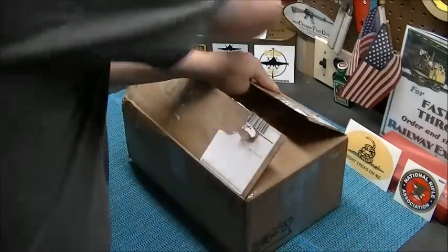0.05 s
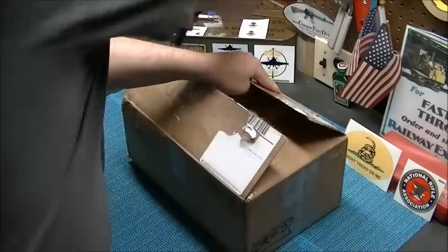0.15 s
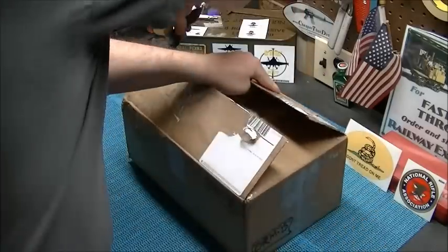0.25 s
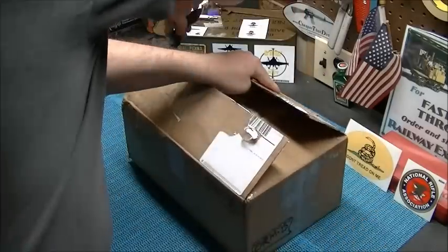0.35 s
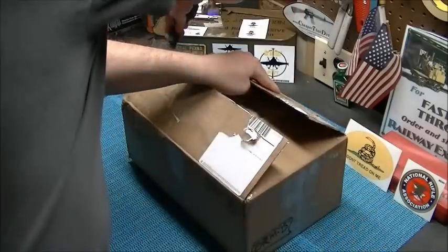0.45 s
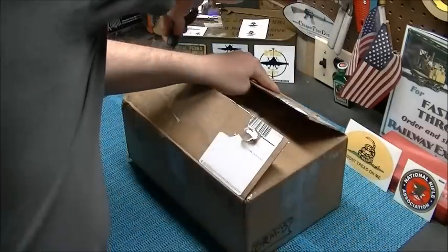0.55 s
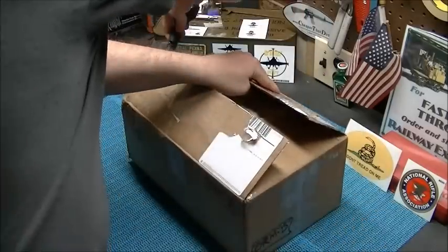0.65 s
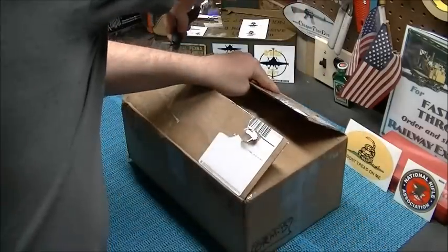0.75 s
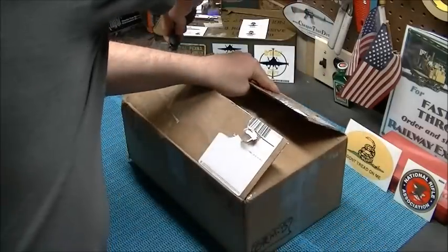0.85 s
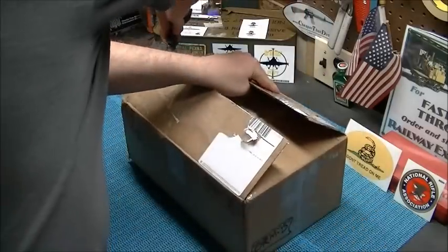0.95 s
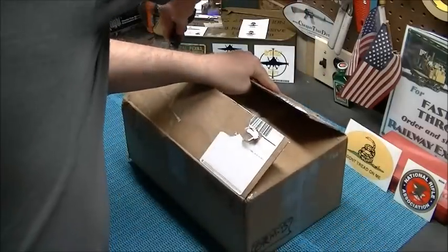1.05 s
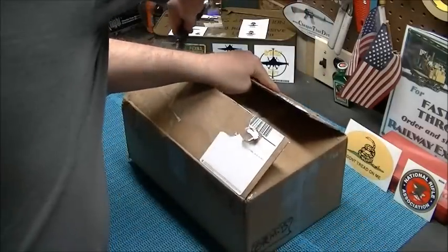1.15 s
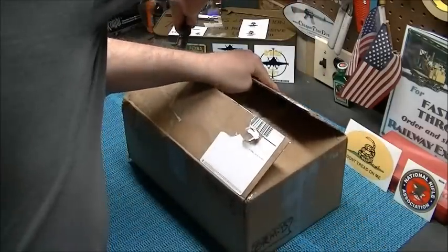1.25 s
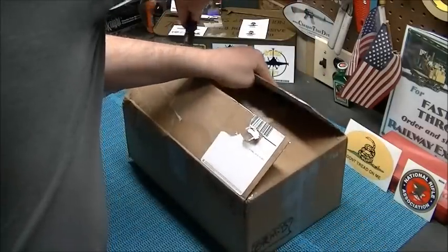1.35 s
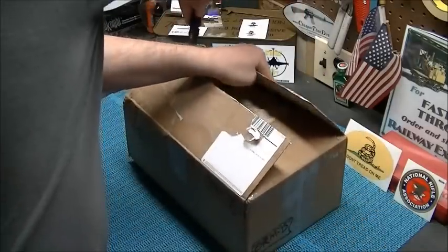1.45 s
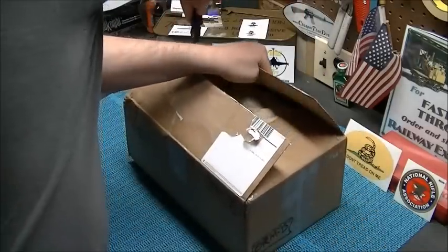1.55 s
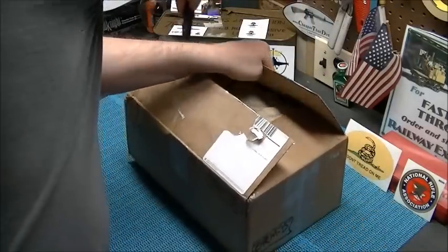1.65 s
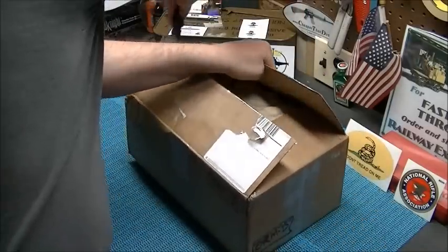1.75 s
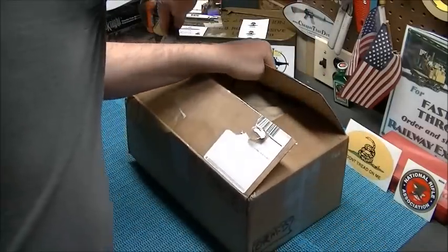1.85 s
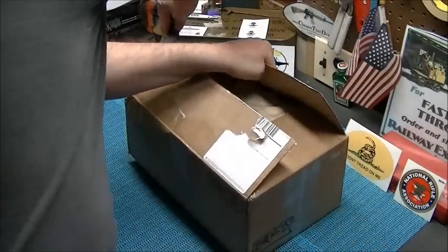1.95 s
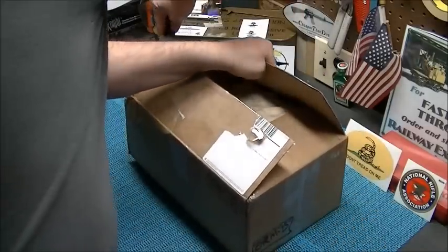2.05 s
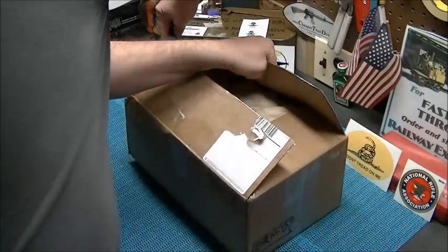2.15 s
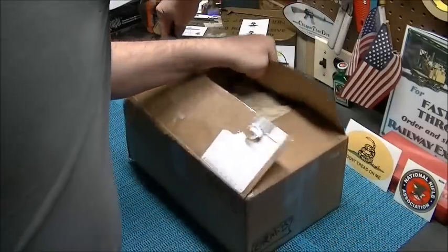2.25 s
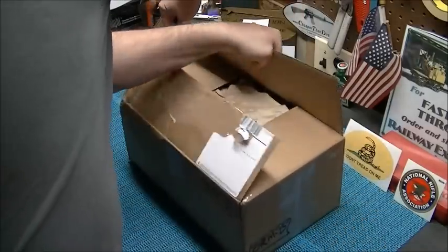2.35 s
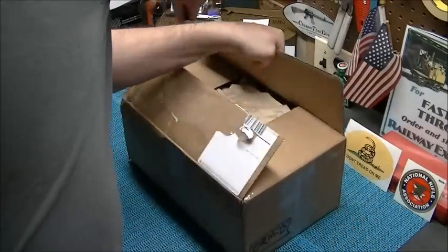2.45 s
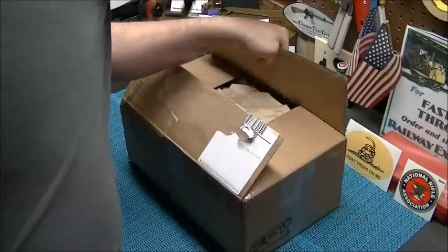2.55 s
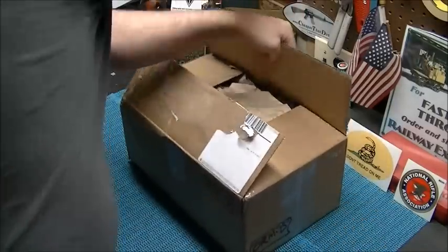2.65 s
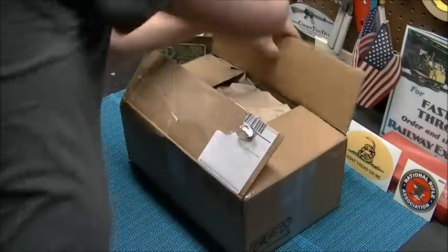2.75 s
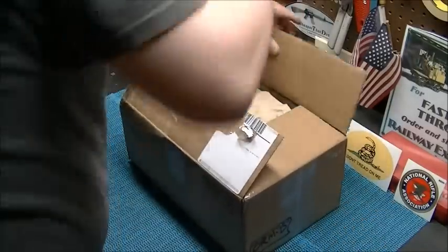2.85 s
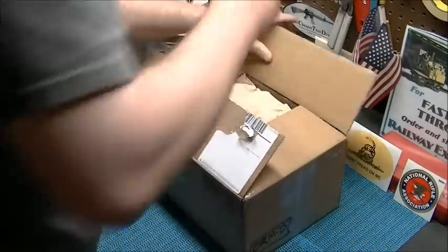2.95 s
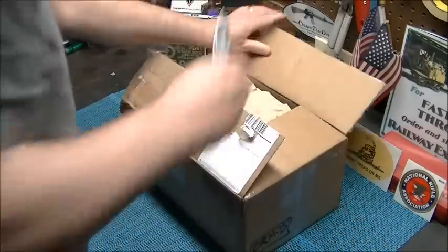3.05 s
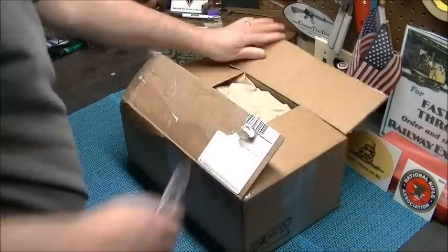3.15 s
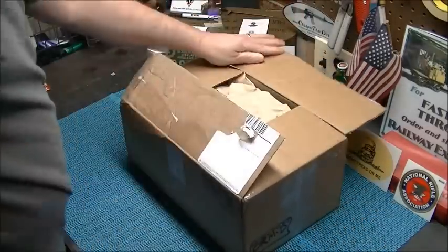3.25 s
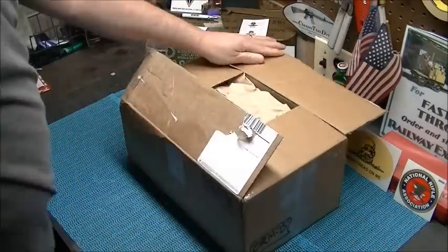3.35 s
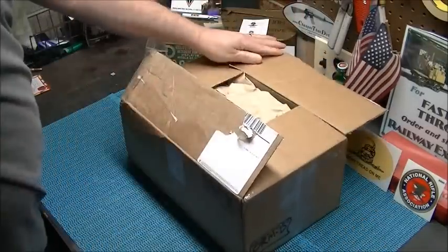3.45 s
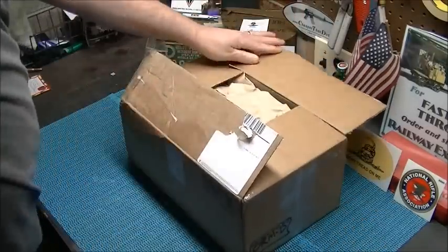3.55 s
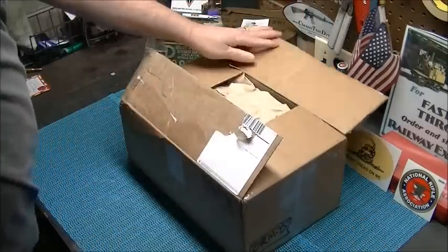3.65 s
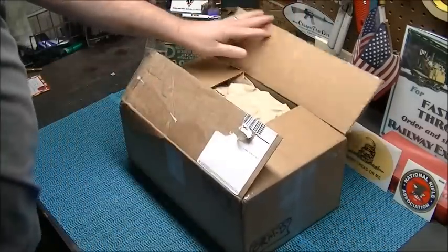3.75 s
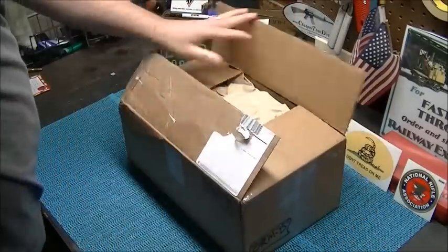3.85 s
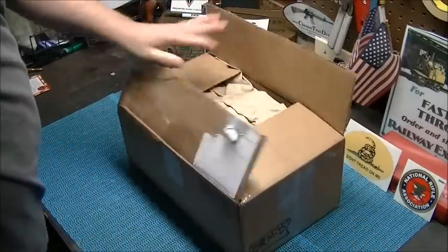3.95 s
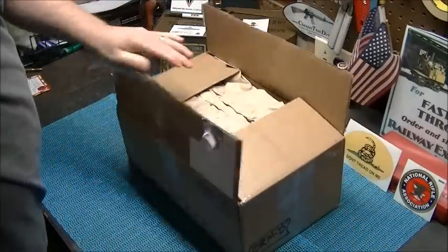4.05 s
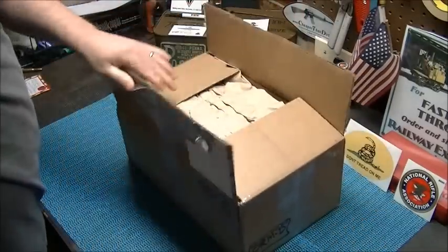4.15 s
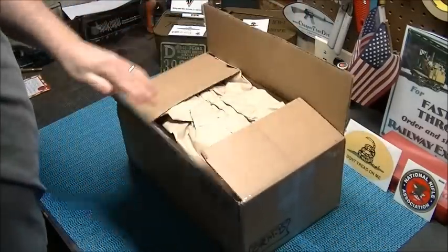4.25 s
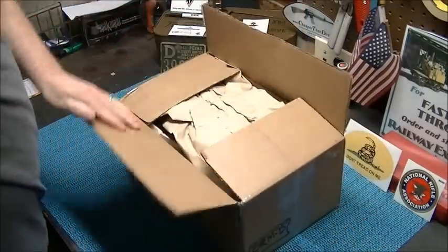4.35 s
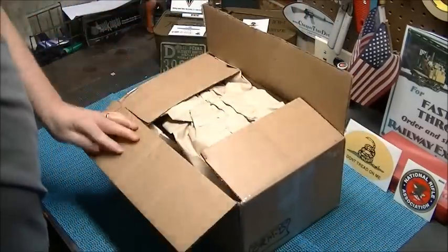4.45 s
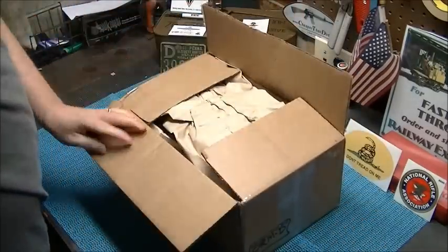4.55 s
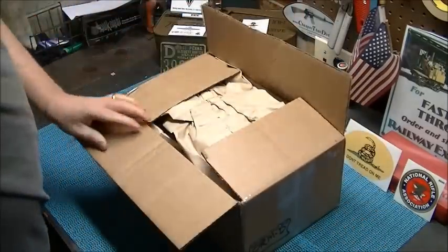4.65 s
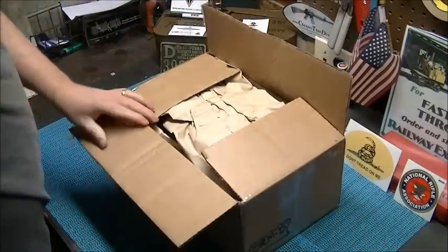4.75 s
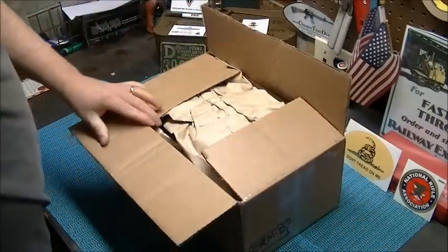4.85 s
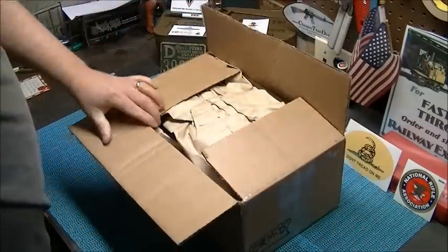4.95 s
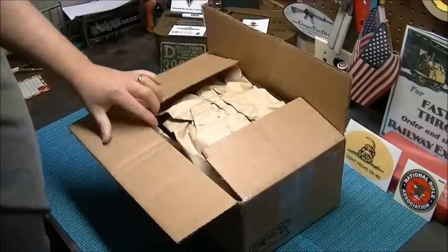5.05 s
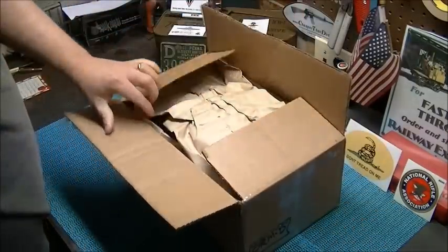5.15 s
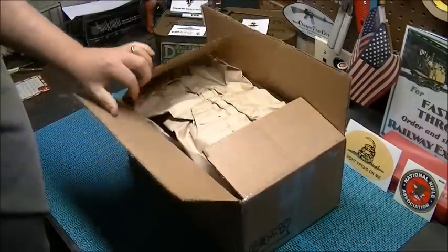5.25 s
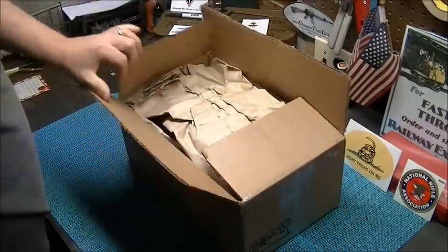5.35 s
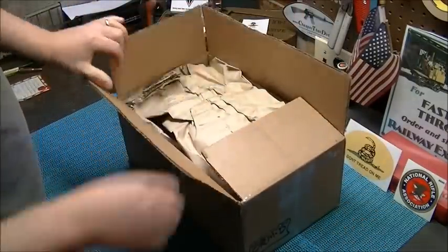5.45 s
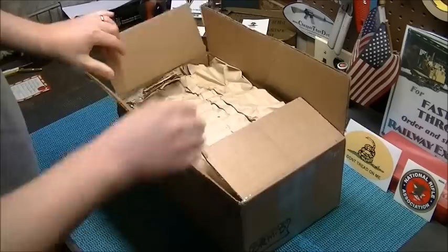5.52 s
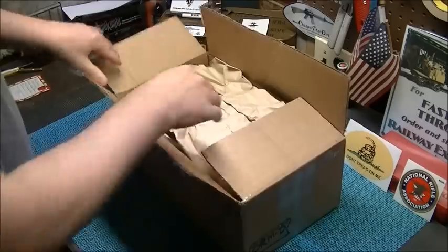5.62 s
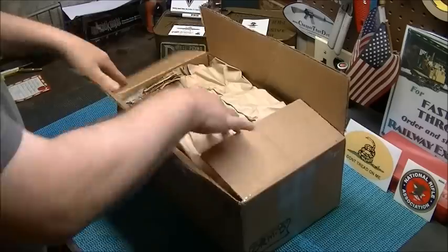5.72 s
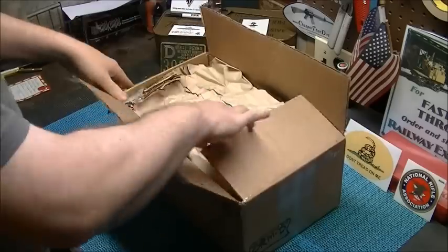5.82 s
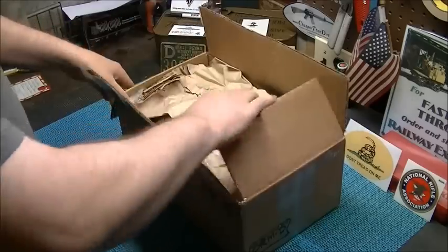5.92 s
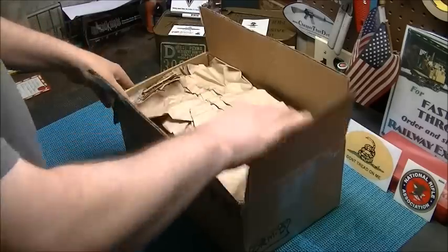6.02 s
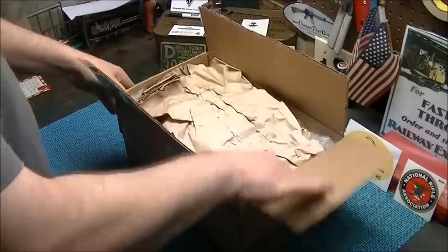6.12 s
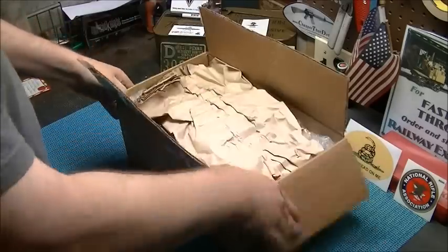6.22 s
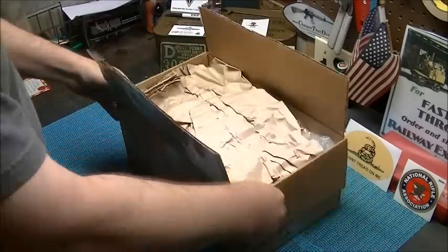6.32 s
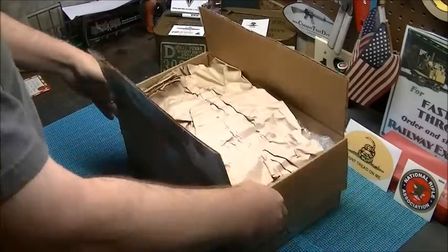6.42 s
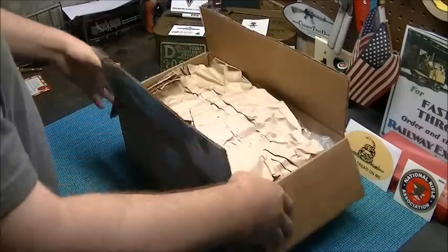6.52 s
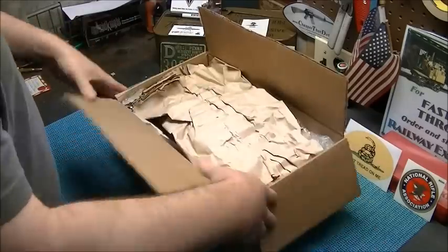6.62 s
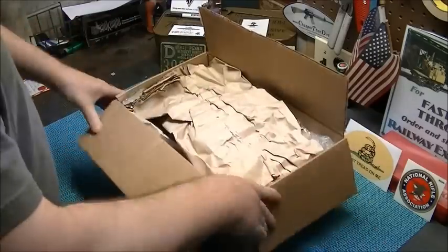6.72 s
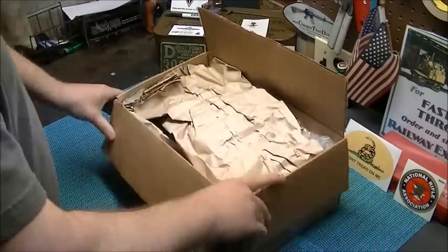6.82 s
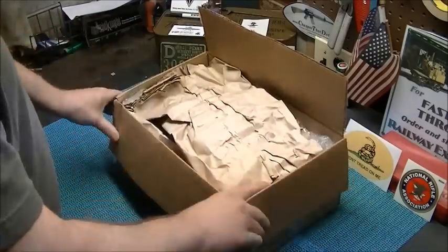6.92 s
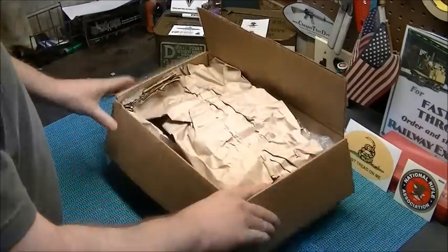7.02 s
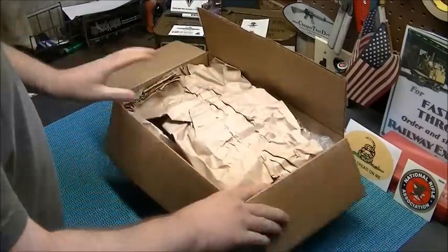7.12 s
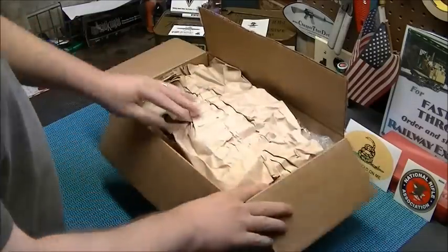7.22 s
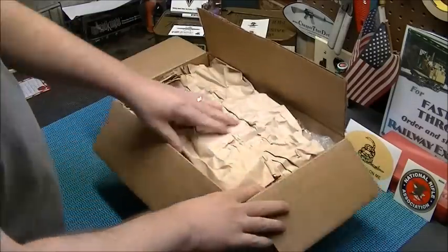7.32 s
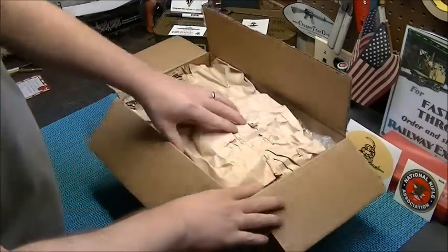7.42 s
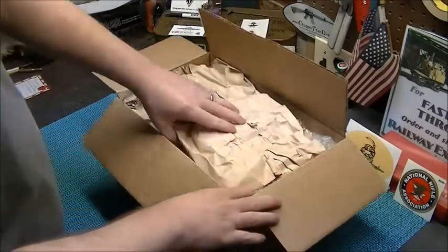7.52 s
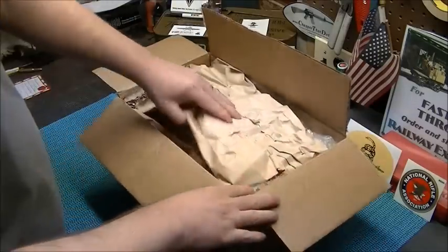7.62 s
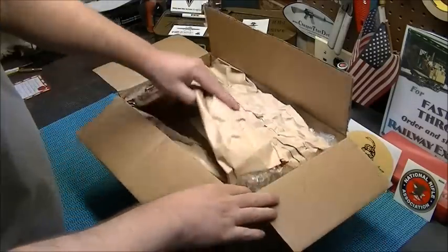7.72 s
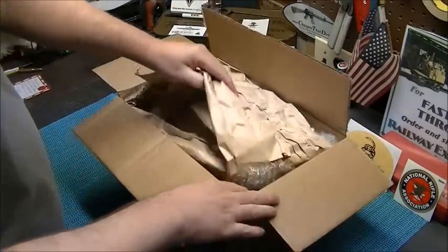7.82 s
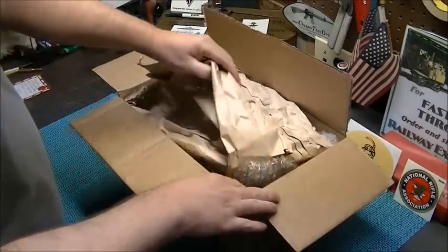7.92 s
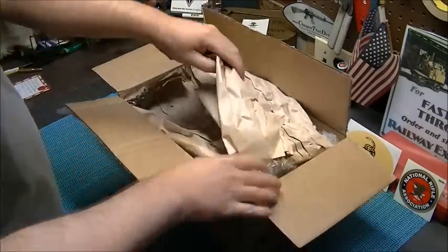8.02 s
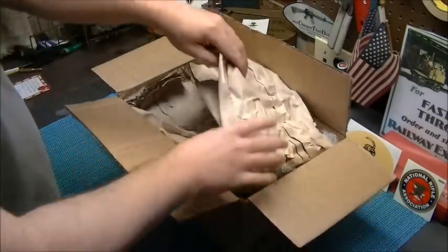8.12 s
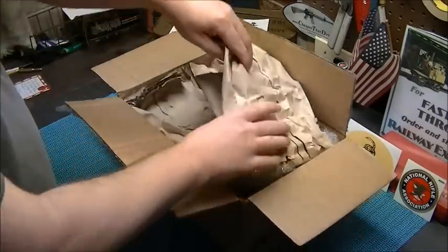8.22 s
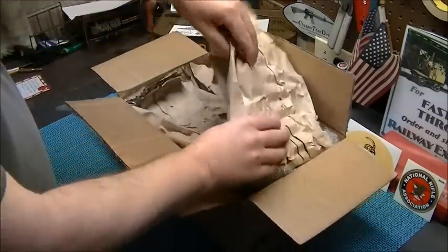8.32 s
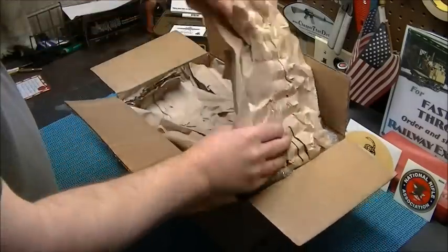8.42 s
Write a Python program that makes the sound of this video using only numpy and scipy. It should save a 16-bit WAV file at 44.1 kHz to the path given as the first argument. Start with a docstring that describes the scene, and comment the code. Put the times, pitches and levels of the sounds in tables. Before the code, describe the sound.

Close, nearly mono, in a small room with short echoes and a faint steady hush. At 0.2 s a soft hollow knock, then near quiet with faint handling rustle and small taps. From 1.0 to 1.6 s dry cardboard creaks, rubs and small cracks. At 2.3 s a hard snap and dull bump start a fluttering tape rip, its hollow tone mostly rising until about 2.7 s. Flap thuds come at 2.8 and 3.1 s, with light rubbing. Around 3.9-4.4 s a flap folds back with a brushing stroke and crisp cracks. At 5.05 s a brief harsh edge scrape; creases pop near 5.5 s. From 6 to 7.2 s palms slide over flaps, with a sharp crack at 6.1 s. From 7.3 s packing paper crinkles; a dull bump lands at 7.6 s, then louder crunching pulls, with short rough squeaks at 8.15-8.4 s.

```python
"""Cardboard box opened

A cardboard box is opened close by on a work table in a small room. The flaps creak, rip free of
their tape and scrape past each other; a hand then lifts crumpled, crinkling, squeaking packing paper.
Strokes are grains of breaking fibre, snaps and knocks are noise bursts with resonances, squeaks are
gliding tones. The box panels and the room ring along over a quiet hush."""
import sys
import numpy as np
from scipy import signal
from scipy.fft import rfft, irfft
from scipy.io import wavfile

SR = 44100
rng = np.random.default_rng(int(sys.argv[2]) if len(sys.argv) > 2 else 0)


def bounce(signal):
    """Save signal as a 16-bit WAV file at the path given by the first command-line argument."""
    frames = np.transpose(np.atleast_2d(signal))
    limited = np.clip(frames, -1, 1)
    pcm = np.round(limited * 32767).astype(np.int16)
    wavfile.write(sys.argv[1], SR, pcm)


N = 373968


def amp(db):
    """Decibels to gain."""
    return 10 ** (np.asarray(db) / 20)


def unit(x):
    """Scales to rms 1."""
    return x / np.sqrt(np.mean(x ** 2) + 1e-20)


def read(points, hz):
    """Interpolates a table on a log-frequency axis."""
    table_hz, value = np.transpose(points)
    return np.interp(np.log(hz + 1), np.log(table_hz + 1), value)


def add(mix, start_s, sound):
    """Mixes a sound in at start_s."""
    part = mix[max(round(start_s * SR), 0):][:len(sound)]
    part += sound[:len(part)]


def colour(x, spectrum, size=2048):
    """Causal minimum-phase filter with the given spectrum."""
    log_gain = np.log(amp(read(spectrum, abs(np.fft.fftfreq(size, 1 / SR)))))
    taps = np.fft.ifft(np.exp(np.conj(signal.hilbert(log_gain)))).real
    return signal.fftconvolve(x, taps[:size // 2])[:len(x)]


def highpass(x, order, cutoff_hz):
    """Butterworth high-pass."""
    return signal.sosfilt(signal.butter(order, cutoff_hz, "high", fs=SR, output="sos"), x)


BODY_TOP_HZ, RASP_TOP_HZ = 1000, 3500


def registers(x, order=3):
    """Splits a sound into body, rasp and fizz."""
    bands = [(BODY_TOP_HZ, "low"), ([BODY_TOP_HZ, RASP_TOP_HZ], "band"), (RASP_TOP_HZ, "high")]
    return [signal.sosfilt(signal.butter(order, hz, kind, fs=SR, output="sos"), x) for hz, kind in bands]


def ring(x, hz, width_hz):
    """One resonance of peak gain 1."""
    return signal.lfilter(*signal.iirpeak(hz, hz / width_hz, fs=SR), x)


def wander(count, top_hz):
    """Slow random signal of rms 1, with changes up to about top_hz."""
    hz = np.fft.rfftfreq(count, 1 / SR)
    spectrum = rfft(rng.standard_normal(count))
    return unit(irfft(spectrum / (1 + (hz / top_hz) ** 4), count))


def fibres(count, per_s, spread_db, smooth):
    """Fibres letting go: clicks of uneven size over a smooth sliding hiss."""
    size = amp(spread_db * np.minimum(rng.exponential(1, count), 4.5))
    polarity = rng.choice([-1, 1], count)
    clicks = size * polarity * (rng.random(count) < per_s / SR)
    return unit(unit(clicks) + smooth * rng.standard_normal(count))


# colour of the room's hush: hz, gain_db
HUSH_COLOUR = [(18, -52), (30, -37), (141, -12), (426, 5.5), (760, 7.5), (937, 1), (1390, 3.5), (2540, -3),
               (6380, -6), (11700, -26), (16000, -16)]


def hush(level_db=-59.5):
    """Steady coloured noise of the room."""
    return amp(level_db) * unit(colour(rng.standard_normal(N), HUSH_COLOUR))


# room decay: hz, t60_s
ROOM_DECAY = [(150, 0.54), (500, 0.28), (2000, 0.35), (6000, 0.23), (15000, 0.18)]


def reflections(early_db=-9, early_s=0.0061, tail_db=-10):
    """Quick returns from flaps and table, then the short tail of a cluttered room."""
    t = np.arange(SR // 2) / SR
    taps = rng.standard_normal(len(t)) * (rng.random(len(t)) < 4000 / SR) * (t > .005)
    hz, when_s, z = signal.stft(taps, SR, nperseg=256)
    decay = amp(-60 * when_s / read(ROOM_DECAY, hz)[:, None])
    tail = signal.istft(z * decay, SR, nperseg=256)[1][:len(t)]
    early = rng.standard_normal(len(t)) * (rng.random(len(t)) < 2500 / SR) * (t > .0015)
    early = early * np.exp(-t / early_s)
    return amp(early_db) * early / np.linalg.norm(early) + amp(tail_db) * tail / np.linalg.norm(tail)


def room(x, count=3, turn_hz=0.7943):
    """The pattern of echoes keeps changing as flaps and arms move."""
    angle = 2 * np.pi * turn_hz * np.arange(N) / SR
    shares = [np.cos(angle + np.pi * k / count) * np.sqrt(2 / count) for k in range(count)]
    return sum(signal.fftconvolve(x * share, reflections())[:N] for share in shares)


# panels and cavity of the box: hz, gain_db, t60_s
BOX_MODES = [(265, -3.5, 0.42), (373, -2, 0.15), (446.5, -3.5, 0.13), (581, -5, 0.16), (638.3, -2, 0.12),
             (824, -14, 0.069), (1240, -11, 0.29), (1440, -31, 0.19), (1810, -14, 0.055)]


def box(x):
    """Everything that touches the box also rings its panels and cavity."""
    return x + sum(amp(db) * ring(x, hz, np.log(1000) / np.pi / t60_s) for hz, db, t60_s in BOX_MODES)


# colour of rubbed cardboard: hz, gain_db
CARDBOARD_COLOUR = [(35, -59), (60, -42), (176, -22.5), (427, -3.5), (698, -1.5), (1090, -3), (1550, 1.5),
                    (1860, 4.5), (2300, -2.5), (5210, 1.5), (7400, 1), (12700, -5.5), (16000, -18)]


def handling(level_db=-65, swell_db=1.5, swell_hz=7):
    """Fingers never rest on the cardboard: a faint rustle under the strokes."""
    rustle = unit(colour(fibres(N, 300, 3.2, 1.0), CARDBOARD_COLOUR))
    return rustle * amp(level_db + swell_db * wander(N, swell_hz))


# whole box on the table: start_s, pitch_hz, level_db
BUMPS = [(2.319, 264, -29.5), (7.607, 395.4, -24.5)]


def bump(row, t60_s=0.11, rise_s=0.0044):
    """The loaded box rocks on the mat: a short, dull, decaying low tone."""
    start_s, hz, db = row
    t = np.arange(SR // 5) / SR
    decay = np.exp(-np.log(1000) * t / t60_s)
    return start_s, np.sin(2 * np.pi * hz * t) * amp(db) * decay * (1 - np.exp(-t / rise_s))


# colour of a knock's dry thud: hz, gain_db
THUD_COLOUR = [(40, -19), (150, -7.5), (400, -4), (700, 2.5), (1300, -1), (1900, -9.5), (3000, -14),
               (7000, -29), (16000, -48)]
# flaps and walls: start_s, level_db (energy per 10 ms), contact_ms,
# lowest_hz (that the panel carries), panel_1_hz, panel_2_hz, panel_3_hz
KNOCKS = [(0.2258, -33.5, 2.4, 173, 261, 616, 995), (0.23, -38, 4.9, 198, 370, 523, 1090),
          (0.515, -44, 2.4, 169, 476, 650, 1390), (0.663, -53, 3.3, 170, 238, 588, 814),
          (0.805, -44.5, 4, 300, 636, 827, 1323), (1.852, -39, 4.9, 200, 314, 510, 790),
          (2.773, -26.5, 3.5, 398, 473, 1442, 1567), (3.127, -28.5, 6.7, 390, 641, 1230, 1987),
          (3.712, -45, 5.4, 255, 452, 695, 1000), (4.104, -36, 8.5, 600, 752, 940, 1106)]


def knock(row, thud_gain=1.7, ring_ms=6.7, rise_ms=3.4):
    """A soft blow on a broad panel: a dry thud and a few short hollow resonances."""
    start_s, db, contact_ms, lowest_hz, *panel_hz = row
    t = np.arange(SR // 8) / SR
    ms = t * 1000
    rise = 1 - np.exp(-ms / rise_ms)
    thud = colour(rng.standard_normal(len(t)) * np.exp(-ms / contact_ms) * rise, THUD_COLOUR)
    envelope = rise * np.exp(-ms / ring_ms)
    hollow = sum(unit(np.sin(2 * np.pi * (hz * t + rng.random())) * envelope) for hz in panel_hz)
    sound = highpass(thud_gain * unit(thud) + hollow, 3, lowest_hz)
    return start_s, unit(sound) * amp(db) * np.sqrt(10 / ms[-1])  # rms to energy per 10 ms


def flex(x, depth_db, frames=14, bins=7):
    """The sheet bends as it is handled, so its resonances come and go."""
    z = signal.stft(x, nperseg=256)[2]
    patch = np.outer(np.hanning(bins), np.hanning(frames))
    patches = signal.convolve2d(rng.standard_normal(z.shape), patch, "same")
    return signal.istft(z * amp(depth_db * unit(patches)), nperseg=256)[1][:len(x)]


def stroke(rows, spectrum, per_s, spread_db, smooth, catch_db, catch_hz, trim_db,
           drift_db=1.0, drift_hz=14.0, flex_db=2.0, crumble_s=0.00069):
    """A surface slides, catching and slipping; each grain crumbles for a moment."""
    start_s, *levels_db = np.transpose(rows)
    t = start_s[0] + np.arange(SR // 2) / SR
    grains = fibres(len(t), per_s, spread_db, smooth) * amp(catch_db * wander(len(t), catch_hz))
    energy = signal.lfilter([1], [1, -np.exp(-1 / (crumble_s * SR))], grains ** 2)
    crumble = np.sqrt(np.maximum(energy, 0))
    sound = colour(flex(crumble * rng.standard_normal(len(t)), flex_db), spectrum)
    mix = np.zeros(len(t))
    for band, db in zip(registers(sound), levels_db):
        path_db = np.interp(t, start_s, db, right=-140)  # silent past the last row
        mix += unit(band) * amp(path_db + trim_db + drift_db * wander(len(t), drift_hz))
    return start_s[0], mix


ATTACK_S, RELEASE_S, DEPTH_DB = 0.035, 0.048, -11


def gesture(row):
    """A hand's stroke swells, holds and dies away: rows of start_s, body_db, rasp_db, fizz_db."""
    start_s, length_s, db, bass_db, treble_db = row
    end_s = start_s + length_s
    corners = [(start_s - ATTACK_S, DEPTH_DB), (start_s, 0), (end_s, 0), (end_s + RELEASE_S, DEPTH_DB)]
    return [(s, db + shape_db + bass_db, db + shape_db, db + shape_db + treble_db)
            for s, shape_db in corners]


# flaps pried, folded back and spread; levels before trim:
# start_s, length_s, level_db, bass_db, treble_db (both relative to level_db)
FLAP_RUBS = [(0.245, 0.03, -72, 5, -21), (0.81, 0.025, -65, 8.5, -20), (1.07, 0.058, -45.5, -1.5, -8),
             (1.15, 0.1, -51.5, -1, -8), (1.29, 0.069, -44, 0.5, -4.5), (1.39, 0.08, -49.5, 0.5, -4),
             (1.518, 0.015, -40, -2, 1), (1.618, 0.012, -42, -9.5, -3), (2.199, 0.07, -50.5, -7, -8),
             (2.775, 0.0097, -35.5, -3.5, -9.5), (2.915, 0.085, -47, -6.5, 3),
             (3.041, 0.088, -47, -6.5, -3.5), (3.15, 0.011, -48, 10, 0), (3.22, 0.067, -49.5, -2.5, -2.5),
             (3.335, 0.018, -49, -10, 3.5), (3.89, 0.125, -37.5, -7, 1.5), (4.11, 0.031, -42.5, -1, 3),
             (4.22, 0.23, -49.5, -8.5, -2.5), (4.37, 0.11, -45.5, -8.5, 2.5), (4.52, 0.061, -49, -6, 0),
             (4.58, 0.082, -52.5, -22, 2.5), (4.82, 0.16, -54.5, -8.5, 0), (5.01, 0.073, -43, -7, -4),
             (5.218, 0.26, -54.5, -4, 0.5), (5.372, 0.024, -45, -2, -3), (5.497, 0.13, -45, -2.5, 3.5),
             (5.7, 0.22, -46.5, -6, 2.5), (5.79, 0.027, -36, -7.5, -16), (5.935, 0.023, -39.5, 1, 1)]


def flap_rub(row):
    """Cardboard rubs cardboard: uneven fibre clicks over a strong sliding hiss."""
    return stroke(gesture(row), CARDBOARD_COLOUR, per_s=430, spread_db=4.5, smooth=2.6,
                  catch_db=2.0, catch_hz=38.7, trim_db=-2.0)


# colour of a palm on cardboard: hz, gain_db
PALM_COLOUR = [(60, -63), (150, -35.5), (380, -11), (700, -3.5), (1150, -4), (2500, -7), (4000, -4),
               (7000, -0.5), (9300, -3.5), (11500, -9), (16000, -20)]
# palm over the flaps; levels before trim:
# start_s, length_s, level_db, bass_db, treble_db (both relative to level_db)
PALM_SLIDES = [(6.068, 0.033, -45, -6, 3.5), (6.124, 0.029, -37.5, -7, -2), (6.173, 0.12, -44.5, -4, 3),
               (6.315, 0.07, -34.5, -9, -10), (6.461, 0.041, -37, -8.5, -11),
               (6.533, 0.11, -42.5, -10, 1.5), (6.702, 0.11, -45, -6.5, -3.5), (6.799, 0.14, -40.5, -10, 1),
               (7.024, 0.08, -43.5, -8.5, 0.5), (7.131, 0.26, -48, -7.5, -2.5)]


def palm_slide(row):
    """A palm slides over the flaps: denser clicks that catch less."""
    return stroke(gesture(row), PALM_COLOUR, per_s=820, spread_db=4.0, smooth=1.9,
                  catch_db=1.0, catch_hz=70, trim_db=-2.03)


# colour of one flap's edge on another: hz, gain_db
EDGE_COLOUR = [(100, -47.5), (600, -7.5), (1900, -0.5), (3200, -2.5), (4500, 2.5), (8000, -1.5),
               (13000, -4.5), (16000, -17)]
# level path before trim: start_s, body_db, rasp_db, fizz_db
SCRAPE_PATH = [(5.036, -58, -46, -55), (5.052, -44, -29.5, -30), (5.078, -38, -30, -24.5),
               (5.112, -58, -29.5, -28), (5.134, -54, -29, -38), (5.145, -30, -31.5, -54),
               (5.175, -51, -55, -42.5), (5.21, -55, -59, -53)]


def scrape():
    """One flap's edge scrapes past another: dense, very uneven clicks."""
    return stroke(SCRAPE_PATH, EDGE_COLOUR, per_s=1200, spread_db=5.5, smooth=1.0,
                  catch_db=0.9, catch_hz=150, trim_db=-0.8)


# colour of tearing tape: hz, gain_db
TAPE_COLOUR = [(35, -73), (60, -43), (149, -28), (262, -13.5), (515, -5), (651, -4), (946, -5), (1410, -3),
               (2470, -11), (4640, -9), (5460, -11.5), (11500, -22), (16000, -35)]
# level path before trim: start_s, body_db, rasp_db, fizz_db
TEAR_PATH = [(2.295, -23.5, -42, -37), (2.33, -29, -28, -30), (2.385, -31, -28, -37.5),
             (2.408, -29, -35, -40), (2.43, -33.5, -34.5, -38), (2.495, -35, -32, -40.5),
             (2.535, -42, -37, -28.5), (2.595, -40, -47, -44.5), (2.66, -43, -36.5, -44.5),
             (2.72, -50, -57, -43.5)]


def tear():
    """The tape rips once: fibre clicks that flutter quickly in level."""
    return stroke(TEAR_PATH, TAPE_COLOUR, per_s=450, spread_db=-0.5, smooth=1.0,
                  catch_db=-1.0, catch_hz=220, trim_db=-2.5)


# gap under the flap, resonating as the tape rips along it: start_s, pitch_hz, level_db
GAP_PATH = [(2.3, 1202, -36), (2.369, 1350, -29), (2.405, 1304, -42), (2.429, 1736, -30),
            (2.531, 1904, -40)]


def rip(width_hz=420):
    """Torn fibres sound the narrow gap: a noise band whose pitch mostly climbs as the flap comes free."""
    start_s, hz, db = np.transpose(GAP_PATH)
    t = np.arange(start_s[0], start_s[-1], 1 / SR)
    throb = wander(len(t), width_hz) + 1j * wander(len(t), width_hz)
    turn = 2 * np.pi * np.cumsum(np.interp(t, start_s, hz)) / SR
    sound = unit((throb * np.exp(1j * turn)).real)
    return start_s[0], sound * amp(np.interp(t, start_s, db)) * signal.windows.tukey(len(t), .1)


RASP_HZ, RASP_HALF_WIDTH_OCTAVES, RASP_LIFT_DB, RASP_BASE_DB = 1970, 0.87, 13, -1


def snap_levels(db, bright_db, hz):
    """Splits a snap's energy by brightness; mid-sized patches radiate best, so they rasp most."""
    distance = np.log2(hz / RASP_HZ) / RASP_HALF_WIDTH_OCTAVES
    rasp_db = RASP_BASE_DB + RASP_LIFT_DB * np.exp(-distance ** 2)
    shares_db = np.array([-bright_db / 2, rasp_db, bright_db / 2])
    return db + shares_db - 10 * np.log10(np.sum(amp(shares_db) ** 2))


# starting colour of a snap: hz, gain_db
SNAP_COLOUR = [(40, -9), (120, -31), (200, -13.5), (360, 3.5), (700, 10.5), (1500, 5.5), (3500, -3.5),
               (7000, -15), (11000, -19.5), (16000, -28.5)]
# tilt points for body, rasp, fizz: hz
REGISTER_HZ = [450, 1900, 6000]
# snaps and creases: start_s, level_db (energy per 10 ms), bright_db (treble over bass),
# die_ms, pitch_hz (of the patch that rings)
SNAPS = [(0.5361, -44.5, 29, 1.6, 4050), (0.547, -48.5, 14, 3.2, 5200), (0.684, -58, 25, 0.85, 4240),
         (1.054, -31, 16, 3.4, 3620), (1.07, -34.5, 27, 0.43, 3050), (1.319, -36.5, 6, 4.8, 1420),
         (1.33, -37, 13, 3.6, 825), (1.4463, -43, 27, 2.3, 6340), (1.488, -28, 7.5, 4.2, 5300),
         (1.512, -28, -6, 3.5, 1540), (1.5293, -33.5, 17, 0.6, 6200), (1.6105, -31.5, 15, 1.6, 1540),
         (1.982, -40.5, 20.5, 1.6, 4660), (2.1963, -37, 10, 1.7, 6170), (2.241, -41, 16, 1.1, 5400),
         (2.2653, -41.5, -12, 3.9, 625), (2.2936, -15.5, 7, 1.73, 1420), (2.364, -30, -7, 1.5, 1400),
         (2.453, -29, -10, 3.8, 880), (2.538, -20.5, 2, 0.66, 1460), (2.609, -32, 0, 3.7, 724),
         (2.773, -39.5, 17, 6.8, 5400), (2.989, -35, 3, 9.9, 1080), (3.126, -38, 23, 9.7, 5400),
         (3.3741, -42.5, -8, 6.3, 2660), (3.413, -44.5, 7, 4.5, 6100), (3.454, -45.5, 12, 9.8, 4200),
         (3.862, -23.5, 19.5, 1.3, 5600), (3.8644, -29, 26, 3, 4300), (3.918, -31.5, 25, 4.1, 3520),
         (3.931, -33.5, 18, 1.5, 6860), (4.091, -31.5, 5, 5.7, 780), (4.104, -25, 6, 7.4, 6300),
         (4.15, -29.5, 16, 2, 6250), (4.167, -31.5, 19, 1.4, 6760), (4.2424, -40, 16, 1.3, 3390),
         (4.284, -32.5, 16, 0.94, 2800), (4.349, -29, 18.5, 3, 6050), (4.528, -41.5, -3, 3, 4530),
         (5.1374, -25.5, 14, 1.3, 5400), (5.283, -38.5, 4, 10.3, 640), (5.404, -39, 19, 7.8, 11400),
         (5.495, -25.5, 9, 7.9, 1050), (5.507, -26, -14, 3.5, 2060), (5.61, -36, 28, 3.1, 5460),
         (5.6635, -33.5, 10, 4.3, 10300), (5.7154, -29, 7.5, 3.6, 8900), (5.946, -36.5, 0, 4.8, 686),
         (6.0373, -37, 7.5, 2.3, 6800), (6.096, -34, 31.5, 1, 6840), (6.1073, -35, 27, 0.86, 7500),
         (6.118, -19, 10.5, 1.55, 8000), (6.135, -29.5, -7, 8.5, 1130), (6.212, -34, -5, 5.5, 734),
         (6.283, -39, -3, 2.2, 2590), (6.381, -25.5, 2.5, 2.3, 1620), (6.4354, -23.5, -6, 3.4, 1470),
         (6.8078, -29.5, 5, 0.96, 6750), (6.861, -34.5, -6, 0.66, 980), (6.889, -38, 0, 1.5, 1300),
         (6.93, -35, 5.5, 3, 4970), (7.0935, -35.5, 22, 1.2, 9500), (7.352, -25.5, 10, 2.5, 3780),
         (7.607, -22, -5, 2.4, 1350), (7.618, -19.5, 9.5, 2.8, 3740), (7.709, -32, -3, 4.6, 650),
         (7.772, -22.5, -8, 7, 650), (7.8436, -23.5, 9, 5.3, 4570), (7.859, -27.5, 7, 7.1, 1530),
         (7.92, -35.5, 2, 1.6, 4440), (7.9796, -28.5, 8, 2, 4550), (8.032, -24, 16, 6.6, 1240),
         (8.0812, -22.5, 7.5, 4.1, 2980), (8.125, -18, 3, 6, 3300), (8.156, -29, 9, 6.9, 3870),
         (8.177, -27, 2, 2.2, 2030), (8.3987, -24, 1.5, 2.9, 1260), (8.425, -25.5, 5, 1.7, 3150)]


def snap(row, patch_gain=1.96, patch_q=3.6, rise_per_ms=0.073, spread_db=3):
    """A crease gives way: a quick avalanche of fibre breaks rings the patch around it."""
    start_s, db, bright_db, die_ms, hz = row
    ms = np.arange(SR // 12) / SR * 1000
    die_ms = max(die_ms, .3)
    swell = 1 - np.exp(-ms / (rise_per_ms * die_ms ** 2))  # slow crushes also start softly
    burst = fibres(len(ms), 9000, spread_db, 0.69) * np.exp(-ms / die_ms) * swell
    burst = colour(burst, SNAP_COLOUR)
    burst = burst + patch_gain * ring(burst, hz, hz / patch_q)
    for _ in range(3):  # smooth tilts approach the wanted register levels
        levels_db = [10 * np.log10(np.sum(band ** 2) * 100 / SR) for band in registers(burst)]
        tilt_db = snap_levels(db, bright_db, hz) - levels_db
        burst = colour(burst, list(zip(REGISTER_HZ, tilt_db)))
    return start_s, burst


def ticks(count=18, start_s=1, level_db=-50, spread_db=3, mean_bright_db=9, die_ms=4.5,
          low_hz=900, high_hz=6500):
    """Once strained, the cardboard gives faint ticks at random: rows like those of SNAPS."""
    return [(start_s + when * (N / SR - start_s), level_db + spread_db * (2 * force - 1),
             mean_bright_db * 2 * small, die_ms, low_hz * (high_hz / low_hz) ** small)
            for when, force, small in rng.random((count, 3))]


# colour of packing paper: hz, gain_db
PAPER_COLOUR = [(35, -64), (60, -57), (193, -28), (380, -7.5), (515, 1), (666, -2.5), (785, 0.5),
                (2580, -1), (5330, -5), (11800, -18.5), (16000, -24)]
# paper pressed, gripped and pulled; levels before trim:
# start_s, length_s, level_db, bass_db, treble_db (both relative to level_db)
PAPER_PULLS = [(7.312, 0.11, -38.5, -7.5, 1), (7.497, 0.049, -38.5, -10.5, 1), (7.615, 0.1, -36, -11, -2.5),
               (7.717, 0.1, -33.5, -7, -1), (7.87, 0.077, -37.5, -6, 1.5), (8.007, 0.096, -34, -9, -4),
               (8.139, 0.05, -30, -11, -6.5), (8.228, .1, -32, -12, -1.5), (8.352, 0.066, -33, -6.5, -5),
               (8.45, 0.028, -42.5, -8, -2)]


def paper_pull(row):
    """Paper slides in the hand: even clicks in hiss, without catching."""
    return stroke(gesture(row), PAPER_COLOUR, per_s=400, spread_db=1.0, smooth=1.0,
                  catch_db=0, catch_hz=70, trim_db=-1.5)


def crinkles(count=5, level_db=-3.5, spread_db=4, bright_db=9, mean_die_ms=1.95,
             low_hz=1200, high_hz=6000):
    """Facets of the crumpled paper buckle a few times in each pull: rows like those of SNAPS."""
    return [(start_s + when * length_s, db + level_db + spread_db * (2 * force - 1), bright_db,
             mean_die_ms * (.5 + slow), low_hz * (high_hz / low_hz) ** small)
            for start_s, length_s, db, *_ in PAPER_PULLS
            for when, force, slow, small in rng.random((count, 4))]


# overtones of a squeak: multiple, level_db (relative to the fundamental)
OVERTONES = [(2, -14), (3, -13.5), (4, -16), (5, -28)]
# stick-slip squeaks: start_s, length_ms, start_hz, end_hz, level_db (before trim)
SQUEAKS = [(8.159, 34, 1358, 1510, -21.5), (8.219, 53, 1078, 1266, -19), (8.27, 33, 1246, 1034, -17.5),
           (8.301, 34, 980, 1160, -28), (8.343, 27, 1135, 934, -21.5)]


def squeak(row, jitter=0.013, jitter_hz=450, flutter_db=1.0, flutter_hz=180, trim_db=-2):
    """Packing sticks and slips fast enough to make a short, rough gliding tone."""
    start_s, length_ms, start_hz, end_hz, db = row
    count = int(length_ms * SR / 1000)
    hz = np.linspace(start_hz, end_hz, count) * (1 + jitter * wander(SR // 5, jitter_hz)[:count])
    turn = 2 * np.pi * np.cumsum(hz) / SR
    tone = np.sin(turn) + sum(amp(over_db) * np.sin(round(k) * turn) for k, over_db in OVERTONES)
    level = amp(db + trim_db + flutter_db * wander(SR // 5, flutter_hz)[:count])
    return start_s, tone * level * signal.windows.tukey(count, .7)


def scene():
    """Strokes, snaps, knocks, bumps and squeaks, nearly in mono over the hush of the room."""
    dry = handling()
    sources = [(bump, BUMPS), (knock, KNOCKS), (flap_rub, FLAP_RUBS), (palm_slide, PALM_SLIDES),
               (snap, list(SNAPS) + ticks() + crinkles()), (paper_pull, PAPER_PULLS)]
    for play, rows in sources:
        for row in rows:
            add(dry, *play(row))
    for play in (scrape, tear, rip):
        add(dry, *play())
    dry = box(dry)
    for row in SQUEAKS:  # the squeaks do not ring the box
        add(dry, *squeak(row))
    mid = dry + room(dry) + hush()
    side_colour = [(200, -28.0), (2000, -11.5), (8000, -15), (13000, -47)]  # hz, gain_db
    side = colour(signal.fftconvolve(dry, reflections())[:N], side_colour)
    side += hush(level_db=-70)
    # the body of the box sits a little to the right
    side -= colour(mid, [(300, -19.0), (1000, -18.5), (3000, -35.0)])
    return np.array([mid + side, mid - side])


def record(dry, ceiling=0.48, rumble_hz=65, cutoff_hz=16100):
    """Rounds off the sharpest cracks, cuts the rumble and limits the band."""
    rounded = dry / (1 + (dry / ceiling) ** 4) ** (1 / 4)
    rounded = highpass(rounded, 2, rumble_hz)
    lowpass = signal.firwin(511, cutoff_hz, window=("kaiser", 9), fs=SR)
    return signal.oaconvolve(rounded, lowpass[None], "same")


dry = scene()
out = record(dry)
bounce(out)
```